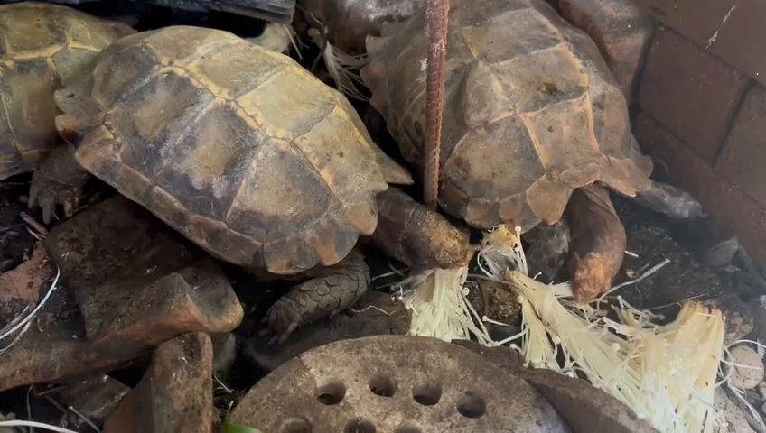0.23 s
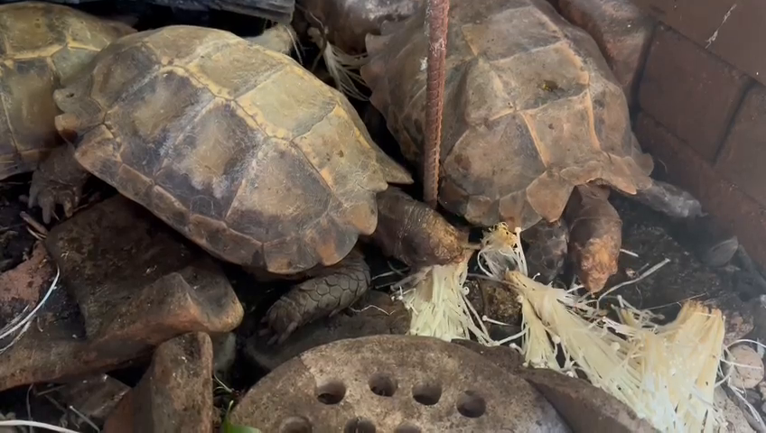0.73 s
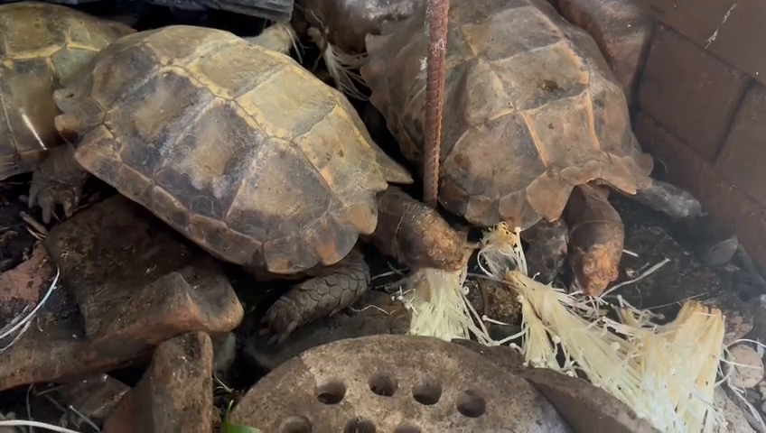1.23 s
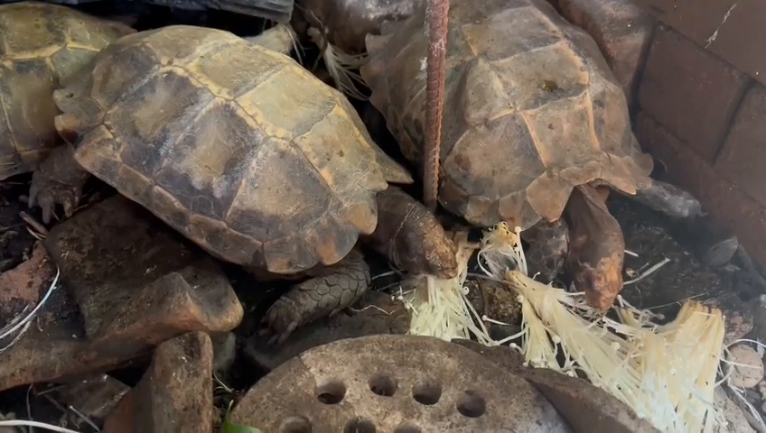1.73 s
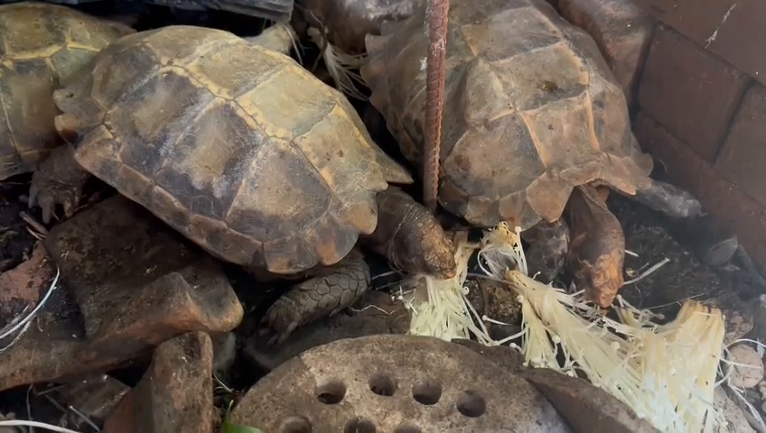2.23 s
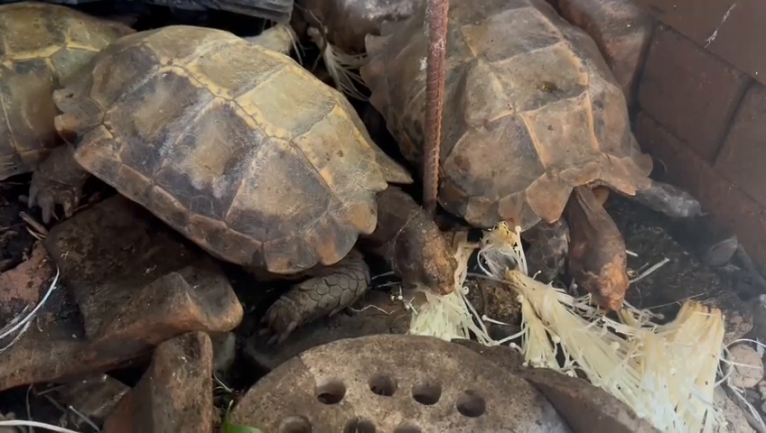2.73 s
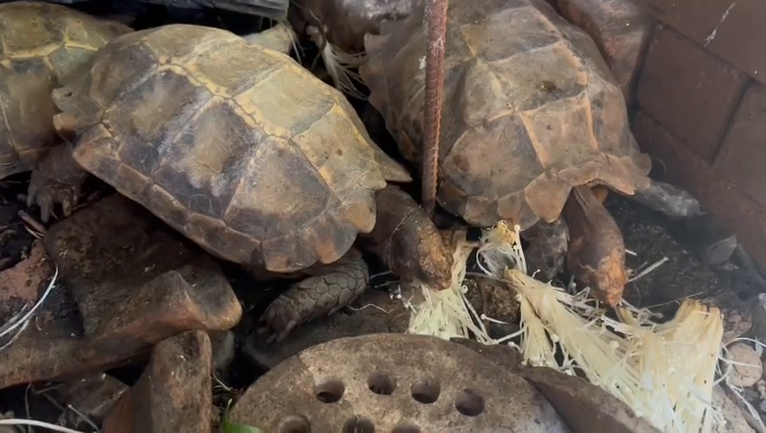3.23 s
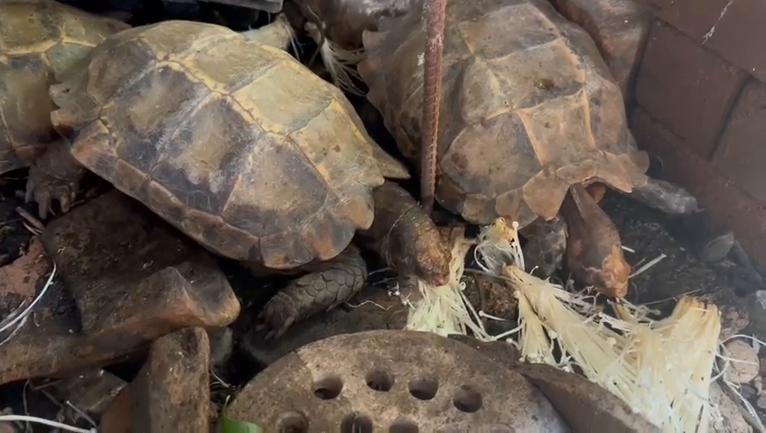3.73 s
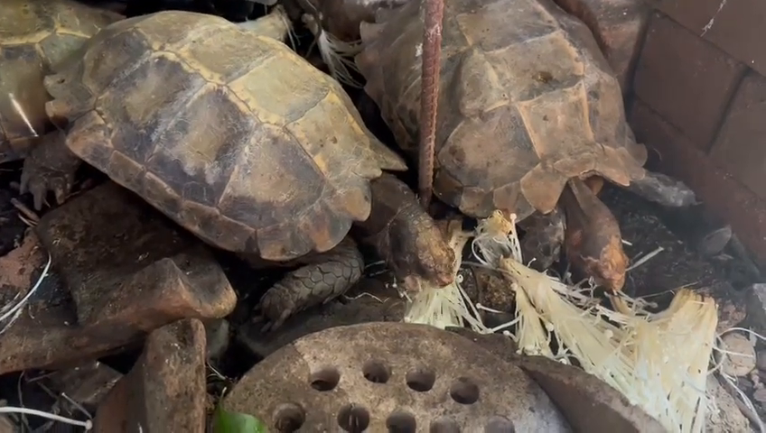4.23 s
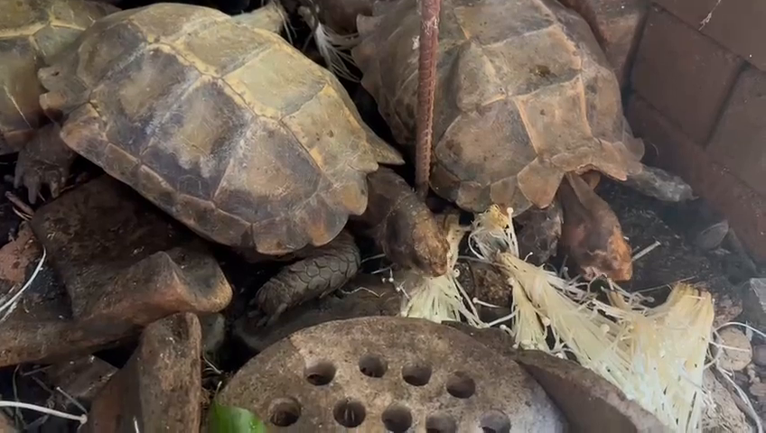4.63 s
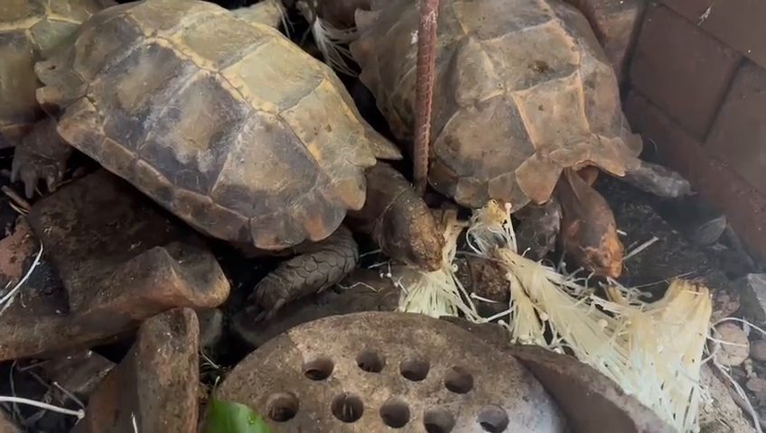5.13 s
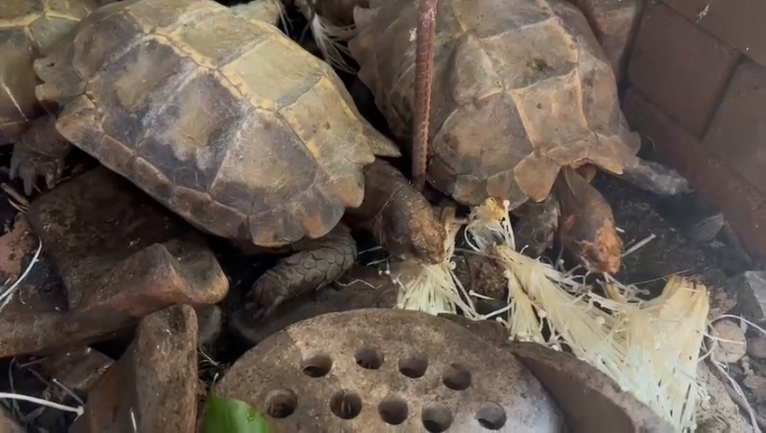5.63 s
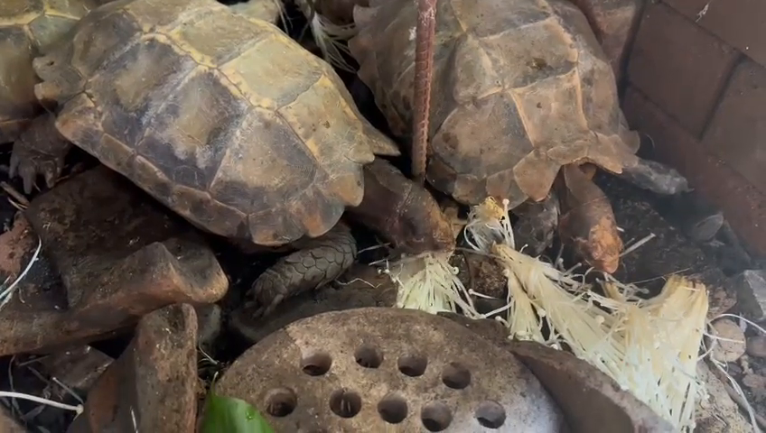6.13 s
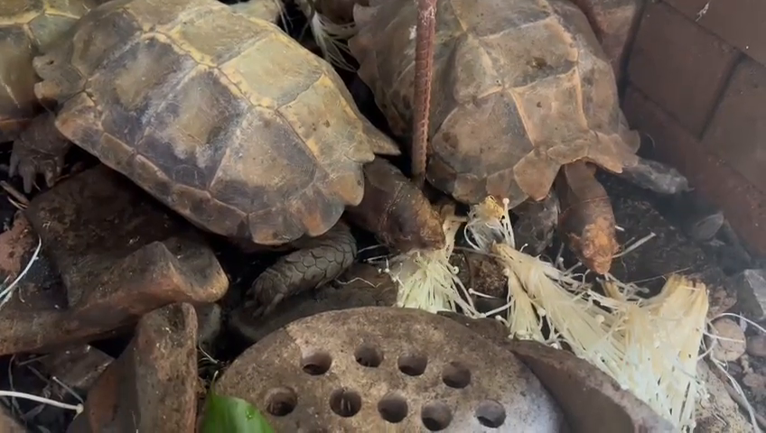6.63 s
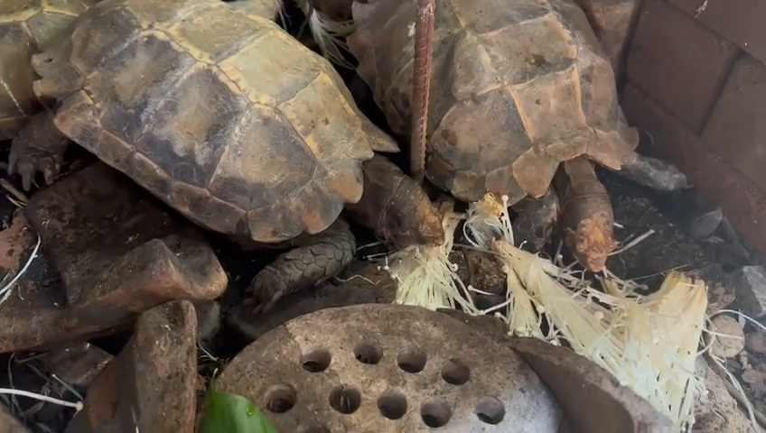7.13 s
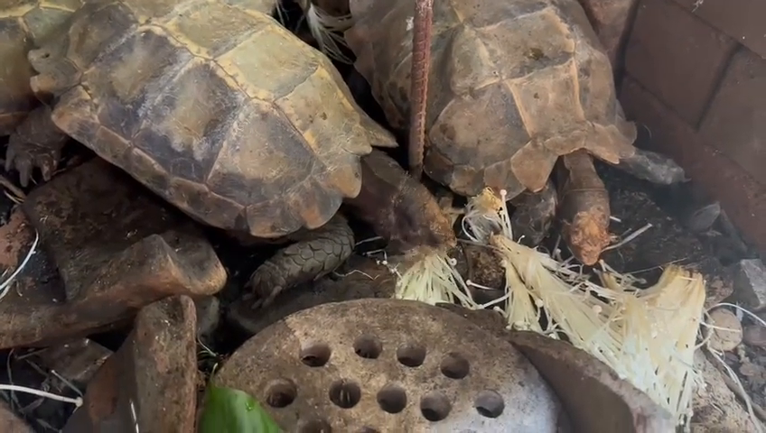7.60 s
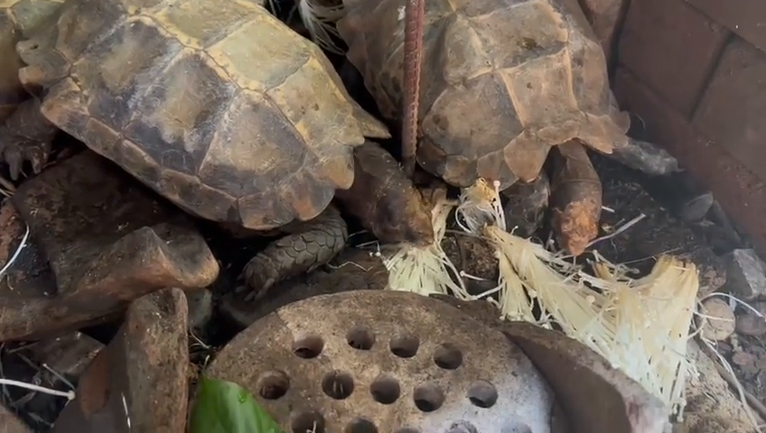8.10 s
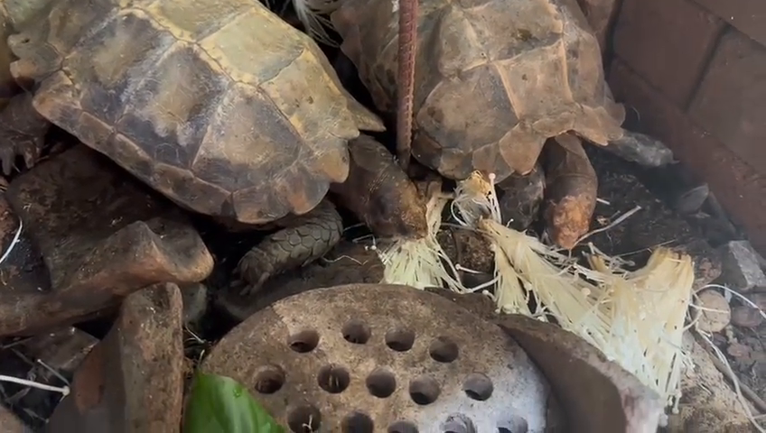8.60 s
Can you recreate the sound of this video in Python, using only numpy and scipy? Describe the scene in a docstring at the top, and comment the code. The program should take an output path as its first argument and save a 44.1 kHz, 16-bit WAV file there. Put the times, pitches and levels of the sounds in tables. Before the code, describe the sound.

A constant low rumble with faint mains hum and soft airy rush lies under close, dry feeding sounds. Tortoise beaks tug a fibrous stalk: crisp pops, short rasping peels, fine crackle, an occasional tiny squeak. Shells drag and knock dully on the floor, loudest with the biggest snaps just before four seconds. The last few seconds are quieter and scattered. Near stereo phone microphone in a small hard-walled pen.

```python
"""Stalk fibres snap, crackle and rasp under the beaks of two tortoises in a small tiled pen, heard close to.
Snaps are enveloped noise bursts in seven bands with dense pen echoes; crackle and rasp are random impulses.
Squeaks are wavering tones. Shells drag and bump as impulses and decaying sines ring shell and floor modes.
Dull impulses are claws and jaws; sines and filtered noise are a machine humming and rumbling beyond the pen."""
import sys
import numpy as np
from scipy import signal
from scipy.fft import rfft, irfft, next_fast_len
from scipy.io import wavfile
from scipy.ndimage import uniform_filter1d

SR = 44100
rng = np.random.default_rng(int(sys.argv[2]) if len(sys.argv) > 2 else 0)


def store_wav(level_fs):
    """Save 16-bit WAV to argv[1]."""
    pcm = np.round(np.clip(np.atleast_2d(level_fs), -1, 1) * 32767)
    wavfile.write(sys.argv[1], SR, pcm.T.astype(np.int16))


N = 390726
TIME_S = np.arange(N) / SR

# machine lines: pitch_hz, level_db
HUM_LINES = [(44.1, -50), (50.04, -46), (100.08, -54), (176.16, -66), (200.16, -59.5), (791.5, -69)]
# rumble spectrum: freq_hz, density_db_per_hz
RUMBLE_SPECTRUM = [(20, -15), (34, -21.5), (46, -7.5), (72, 3), (90, -6), (165, -11), (240, -17),
                   (330, -15), (420, -27), (540, -31.5)]
# slow swell of the rumble: time_s, level_db
RUMBLE_SWELL_CURVE = [(0, -0.5), (2.1, -4), (2.8, -3), (3.1, 2), (3.7, -3.5), (4.05, -1.5), (4.5, -2.5),
                      (6.4, -4), (7.5, -3), (8.85, -4.5)]
# spectrum of the rush of air: freq_hz, density_db_per_hz
AIR_SPECTRUM = [(250, -30), (520, -12), (680, 6.5), (880, 0.5), (1150, -5.5), (2300, -6.5), (4500, -12.5),
                (8300, -19), (9400, -30), (10800, -48)]
# small contacts of claws and jaws: time_s, level_db
FIDGET_CURVE = [(0, -61), (1.1, -59), (1.4, -66.5), (2.9, -63.5), (3.3, -57), (4.4, -57.5), (5.2, -62),
                (6.1, -65.5), (6.4, -59), (7.2, -58), (7.8, -62.5), (8.2, -60.5), (8.85, -59.5)]
# a beak tugs at the stalk: peak_s, build_up_s, release_s, level_db
TUG_EVENTS = [(0.09, .03, .12, -48), (0.19, .03, 0.069, -57), (0.49, .15, .18, -47.5),
              (0.65, .05, 0.061, -50), (0.78, .02, .12, -51.5), (1.13, .27, .06, -52),
              (1.38, .02, .15, -58), (1.67, .08, 0.045, -51), (1.85, .06, .27, -56.5),
              (2.4, .2, .12, -56.5), (2.64, 0.046, 0.034, -56), (2.75, .03, .025, -52.5),
              (3.22, .13, .12, -45), (3.4, .08, .11, -46), (3.68, .3, .2, -46), (3.99, .08, .25, -45),
              (4.38, .17, .2, -53.5), (4.8, .24, .14, -44), (5.02, .02, .04, -55), (5.4, .25, .5, -58.5),
              (6.32, .05, 0.055, -50.5), (6.5, .07, 0.04, -52.5), (6.72, .03, .05, -53),
              (7.28, .05, .15, -59.5), (7.49, .07, 0.1, -48), (8.07, .05, .15, -51.5),
              (8.41, .12, .2, -55.5), (8.61, 0.086, .07, -53.5), (8.73, 0.035, .1, -56)]
# fibre spectrum: freq_hz, density_db_per_hz
FIBRE_SPECTRUM = [(300, 5.5), (700, 0), (1050, 1), (1450, -2), (1900, 0), (2550, 1), (2930, -0.5),
                  (3400, -1.5), (4400, 1), (5200, -1), (7400, 4), (8600, -3), (9600, -12), (10800, -28.5)]
# a shell is shoved over the floor: peak_s, build_up_s, release_s, scrape_db, shell_ring_db
SHOVE_EVENTS = [(0.13, 0.06, 0.05, -50, -44.5), (0.59, 0.1, 0.083, -44.5, -53),
                (1.18, 0.32, 0.031, -45, -54), (3.13, 0.11, 0.14, -37, -57), (3.24, 0.2, 0.15, -39, -42),
                (3.37, 0.17, 0.26, -41, -37), (3.6, .4, 0.14, -45.5, -46), (3.78, 0.3, 0.042, -40, -32),
                (4.02, 0.03, .06, -47, -46), (4.22, 0.044, 0.11, -67, -45.5), (4.92, 0.14, 0.092, -41, -64),
                (5.59, 0.097, 0.05, -48, -62), (6.43, 0.14, 0.089, -47, -60), (6.8, 0.3, .3, -59, -60),
                (7.49, 0.076, 0.037, -43.5, -47), (8.11, 0.12, 0.22, -49, -61),
                (8.35, 0.11, 0.19, -45.5, -51), (8.73, 0.06, 0.15, -55, -58)]
# resonances of shell and floor, deepest first: freq_hz, width_hz, level_db
SHELL_MODES = [(152.1, 14, 14.5), (337, 36, 3), (394.4, 43, 7), (479, 31, -3), (695, 500, -14)]
# fibres snapping: start_s, tear_time_ms, level_db, brightness_db (dry and thin > 0, thick and juicy < 0), pitch_hz
SNAP_EVENTS = [(0.062, 0.9, -58.5, 2.5, 950), (0.1051, 1.9, -43.5, -6.5, 5260),
               (0.283, 0.29, -53, 1.5, 2510), (0.329, 0.8, -59, 5, 3200), (0.3394, 0.84, -34.5, 4, 706),
               (0.4735, 0.9, -52, -2, 3200), (0.5412, 0.26, -54.5, 4.5, 3200),
               (0.56, 1.03, -45.5, -10, 1540), (0.598, 0.74, -56, 6, 5200), (0.637, 1, -64, 12, 5200),
               (0.642, 0.79, -55, 15.5, 5200), (0.658, 0.27, -53, 12.5, 700), (0.767, 2.4, -49, -1.5, 1560),
               (0.834, 1.5, -50.5, -2, 5200), (0.855, 1.5, -53, 0, 4200), (0.947, 1.1, -64, 7, 950),
               (1.096, 0.86, -56, -10, 5200), (1.415, 0.97, -70, 9, 950), (1.6416, 0.65, -56, 7, 700),
               (1.6624, 1.15, -48, 3, 1200), (1.872, 0.94, -51.5, 3, 1200), (2.078, 1.2, -55.5, 3, 700),
               (2.5588, 0.6, -57, 0, 6500), (2.878, 0.4, -52.5, 5.5, 1550), (2.922, 0.46, -54.5, 3, 1200),
               (2.9608, 0.41, -36, 2, 5800), (3.055, 1.5, -54, 5, 1200), (3.145, 0.41, -45, -9, 5200),
               (3.1669, 1.47, -25.5, 0.5, 4080), (3.285, 0.66, -53, -9, 5170), (3.348, 1, -50, -0.5, 950),
               (3.386, 0.9, -52, -1, 4200), (3.4123, 0.51, -48.5, 0, 3200),
               (3.5205, 0.26, -52.5, 7.5, 4200), (3.553, 0.72, -50.5, 0, 3200), (3.5716, 0.39, -46, 2, 450),
               (3.609, 0.6, -56.5, 6, 6500), (3.633, 1, -39, 5, 2500), (3.637, 2.04, -29, -8, 6740),
               (3.68, 0.57, -52, -10, 3190), (3.691, 0.7, -63, -6, 7000), (3.705, 1.5, -28, 5, 454),
               (3.7405, 0.6, -29, 1, 3000), (3.77, 0.45, -36, 7.5, 2500), (3.784, 2.8, -40, 10, 1986),
               (3.891, 1.9, -56.5, 8, 5200), (3.9742, 0.6, -24.5, 2.5, 2300), (4.159, 0.34, -57, 0, 5200),
               (4.1899, 0.23, -54.5, 3, 700), (4.277, 1.5, -57, -4, 2600), (4.286, 2, -48, 4, 2700),
               (4.326, 1, -59, -7, 1400), (4.617, 0.95, -29.5, -2.5, 2420), (4.69, 0.88, -48.5, 1, 1200),
               (4.746, 0.6, -53, 5, 3200), (4.7682, 0.69, -39.5, 1.5, 950), (4.79, 0.94, -45.5, 0, 2000),
               (4.828, 0.29, -44.5, 1, 5200), (4.843, 1, -45.5, 7, 5230), (4.876, 0.8, -64, 1, 2500),
               (4.9088, 0.73, -35, -2, 940), (5.021, 0.59, -60, -1, 950), (5.122, 0.44, -56, 1, 1200),
               (5.3008, 0.68, -60.5, 4, 3200), (5.378, 0.3, -60, -0.5, 5200), (5.564, 0.74, -63.5, 3, 5230),
               (6.2604, 1.6, -49.5, -9, 604), (6.305, 1.6, -55, -10, 620), (6.425, 2, -62.5, -11, 650),
               (6.482, 1.2, -60.5, 5, 2000), (6.609, 0.71, -59.5, -9, 1580), (6.741, 1.3, -64, -10, 2500),
               (6.891, 0.79, -51.5, -1.5, 450), (7.03, 0.48, -67, -8, 3200), (7.0976, 0.25, -61, -3, 3230),
               (7.231, 0.93, -57.5, -2.5, 3540), (7.405, 0.46, -61.5, 2, 700),
               (7.4764, 1.8, -51.5, -2, 4200), (7.544, 0.8, -56, -1, 5200), (7.655, 0.91, -59.5, 2, 5170),
               (8.045, 1.06, -49, -3, 5270), (8.078, 0.35, -53.5, -6, 4200), (8.4035, 0.46, -45, 6.5, 2000),
               (8.511, 0.2, -58.5, 11.5, 700), (8.599, 0.36, -54.5, 3, 950), (8.7135, 0.6, -70, 10, 4120),
               (8.7994, 0.58, -59.5, 7.5, 4200)]
# snap bands, thud to crispness: low_hz, high_hz, onset_lag_ms, t60_s, level_db, tilt_db_per_brightness_db
SNAP_REGISTERS = [(278, 520, 1.42, 0.049, -8, -1.37), (567, 870, 0.79, 0.083, -8.5, -0.94),
                  (955, 1466, 0.32, 0.094, -7, -0.37), (1620, 2470, 0.29, 0.067, -5, -0.28),
                  (2470, 3970, 0.2, .065, -3, -0.15), (4180, 6900, 0.14, 0.069, -3, .5),
                  (5780, 9150, 0.021, 0.046, -4, 1.054)]
# body lurches and shell bumps as a stalk gives: start_s, shell_ring_db, floor_knock_db
JOLT_EVENTS = [(0.1039, -45, -36.5), (0.337, -39, -64), (0.5627, -34, -41), (2.9611, -45, -66),
               (3.167, -24, -29.5), (3.378, -41, -31.5), (3.639, -24, -24), (3.711, -22.5, -22),
               (3.74, -20.5, -25), (3.771, -26.5, -41), (3.9749, -30, -38.5), (4.614, -25.5, -39),
               (7.231, -37, -54), (7.48, -27.5, -41), (8.043, -41, -48)]
# floor knock: freq_hz, t60_s, level_db
KNOCK_MODES = [(320, .06, -10.5), (390.2, 0.12, 2), (465.6, 0.086, 0.5), (525, 0.061, -7)]
# strips peeling: start_s, length_s, level_db, swell_db (start to end), brightness_db
PEEL_EVENTS = [(0.38, 0.2, -49.5, 1, 6), (0.603, .12, -53.5, 1, 2), (0.761, 0.11, -50, 7, -1),
               (.92, 0.28, -52.5, 6, -8), (2.285, 0.19, -63.5, 9, 3), (3.193, 0.41, -54.5, -7, -4.5),
               (3.652, 0.154, -47.5, 14, -3.5), (3.98, 0.15, -48, -17, -4), (4.247, 0.22, -61.5, 11, 4),
               (4.652, 0.25, -47, 15, -1), (6.278, 0.26, -60.5, 2, -13), (7.44, .12, -50, -5, -6),
               (8.065, 0.13, -58, -13, -15)]
# taut fibres squeaking on a beak: start_s, length_s, pitch_hz, level_db (before gain_db)
SQUEAK_EVENTS = [(0.762, 0.022, 2550, -44.5), (1.576, 0.069, 3240, -60), (3.008, 0.1, 1504, -51.5),
                 (4.006, 0.11, 3090, -47), (5.298, 0.01, 3550, -49.5), (6.008, 0.65, 2910, -71),
                 (6.822, 0.023, 1360, -55)]
# resonances of the pen and the things in it: freq_hz, width_hz, level_db
PEN_MODES = [(378, 11, -10.5), (930, 99, -9.5), (1755, 59, -11.5), (2560, 31, -18), (2920, 185, -8.5),
             (5990, 80, -10)]
# side against mid, scattered sound: freq_hz, level_db
SCATTER_CURVE = [(60, -31), (170, -21), (350, -15), (520, -5), (700, -3.5), (1200, -3.5), (2000, -7.5),
                 (3000, -1.5), (4200, -1), (6300, -4.5), (9000, 2), (11000, 13)]
# side against mid, sound reaching the right port first: freq_hz, level_db
LEAD_CURVE = [(100, -62), (450, -7), (800, 0.5), (2000, -18.5), (4500, -14), (6500, -29.5), (8500, 4),
              (11000, 18)]
# side against mid, in step, animals nearer the right port: freq_hz, level_db
RIGHTWARD_CURVE = [(200, -65), (400, -30), (600, -22.5), (850, -24.5), (1150, -12), (1800, -33),
                   (4000, -40.5)]

TUG_SWELL_DB, SHOVE_SWELL_DB = 12, 22.5  # rise over the build-up, fall over the release
CHEW_DB, SHUFFLE_DB = -67, -61.5  # quiet chewing and shifting feet between efforts
RESTLESS_DB, RESTLESS_PER_S = 3, 7  # waver of that quiet activity
JERK_DB, JERKS_PER_S = 1.0, 30  # catch and slip of an effort
RING_DB, RING_OCTAVES = 7, 0.4  # lift around each fibre's own pitch
EARLY_DB, EARLY_S = 3.5, 0.03  # unevenness of the first reflections and its decay
PEEL_EDGE_S, PEEL_SPLIT_HZ = 0.017, 3800  # fade in and out; brightness pivot
TOP_HZ = 11800


def undb(db):
    """Decibels to gain."""
    return 10 ** (np.asarray(db) / 20)


def unit(x):
    """Scale to rms 1."""
    return x / np.sqrt(np.mean(x ** 2) + 1e-20)


def colour(x, points, turn=1):
    """Filter by a (freq_hz, level_db) curve; a complex turn also shifts the phase."""
    curve_hz, curve_db = np.transpose(points)
    size = next_fast_len(N + 4096)
    bin_hz = np.maximum(np.arange(size // 2 + 1) * SR / size, 1)
    gain = undb(np.interp(np.log(bin_hz), np.log(curve_hz), curve_db))
    return irfft(rfft(x, size) * turn * gain, size)[..., :N]


def band(x, low_hz, high_hz, order=2):
    """Causal band-pass."""
    edges_hz = [low_hz, min(high_hz, SR / 2 - 1)]
    return signal.sosfilt(signal.butter(order, edges_hz, "band", fs=SR, output="sos"), x)


def walk(changes_per_s):
    """Smooth random curve of rms 1."""
    step = max(int(SR / changes_per_s), 2)
    held = np.repeat(rng.standard_normal(N // step + 1), step)
    return unit(uniform_filter1d(held, step)[:N])


def grains(rate_per_s, spread_db):
    """Random impulses: many small, a few large."""
    chance = rng.random(N) * SR / rate_per_s
    hit = chance < 1
    sizes = undb(spread_db * np.minimum(-np.log(chance[hit]), np.pi))
    out = np.zeros(N)
    out[hit] = sizes * (-1) ** np.flatnonzero(hit)  # sign by odd or even sample
    return unit(out / np.sqrt(rate_per_s))


def echoes(t60_s, direct):
    """Mid and side response: direct sound, then dense reflections dying away."""
    t = TIME_S[:int(t60_s * SR)]
    response = rng.standard_normal((2, len(t))) * np.exp(-np.log(1000) * t / t60_s)
    response *= undb(EARLY_DB * np.exp(-t / EARLY_S) * rng.standard_normal(response.shape))
    response /= np.sqrt(np.sum(response ** 2) / 2)
    response[0, 0] += direct
    return response / np.sqrt(1 + direct ** 2)


def in_pen(x, t60_s, direct):
    """A sound with its reflections, as mid and side."""
    return signal.oaconvolve(x[None], echoes(t60_s, direct), axes=1)[:, :len(x)]


def effort(rows, swell_db, rest_db):
    """Level in dB over time: efforts build jerkily and let go above a restless quiet activity."""
    t = TIME_S[::64]
    power = undb(rest_db + RESTLESS_DB * walk(RESTLESS_PER_S)[::64]) ** 2
    for peak_s, build_s, release_s, level_db in rows:
        building = (peak_s - t) / max(build_s, .005)
        releasing = (t - peak_s) / max(release_s, .005)
        away = np.minimum(np.maximum(building, releasing), 10)
        power = power + undb(level_db - swell_db * away) ** 2
    return np.interp(TIME_S, t, 10 * np.log10(power)) + JERK_DB * walk(JERKS_PER_S)


def machine(rumble_db=-44.0, air_db=-60, waver_db=2.5):
    """Mains hum and a motor's lines, wavering sines, over uneven rumble and a soft rush of air."""
    hum = 0
    for pitch_hz, level_db in HUM_LINES:
        phase = 2 * np.pi * (pitch_hz * TIME_S + rng.random()) + 0.22 * walk(0.72)
        hum = hum + undb(level_db + waver_db * walk(2.4)) * np.sin(phase)
    surge_db = 1.2 * walk(7) + np.interp(TIME_S, *np.transpose(RUMBLE_SWELL_CURVE))
    rumble = band(colour(rng.standard_normal((2, N)), RUMBLE_SPECTRUM), 36.4, 530, order=3)
    rumble = unit(rumble) * undb(rumble_db + surge_db)
    air = unit(colour(rng.standard_normal((2, N)), AIR_SPECTRUM)) * undb(air_db + 0.78 * walk(3.6))
    return rumble + air + hum * np.array([[1], [0]])  # hum in mid only


def fidget(rate_per_s=40, spread_db=3.5, side_db=-4):
    """Claws and jaws nudge scraps on the floor: soft, dull contacts in three places."""
    contacts = sum(in_pen(grains(rate_per_s, spread_db), t60_s=.07, direct=0.33) for _ in range(3))
    level_db = np.interp(TIME_S, *np.transpose(FIDGET_CURVE))
    return unit(band(contacts, 372, 1060)) * undb(level_db) * undb([[0], [side_db]])


def pings(impulses, low_hz, high_hz, decay_cycles):
    """Every impulse rings for a few cycles at a pitch of its own."""
    at = np.flatnonzero(impulses)[:, None]
    n = np.arange(SR // 100)
    pitch_hz = low_hz * (high_hz / low_hz) ** rng.random(at.shape)
    turns = pitch_hz * n / SR
    rings = impulses[at] * pitch_hz * np.exp(-turns / decay_cycles) * np.sin(2 * np.pi * turns)
    return unit(np.bincount((at + n).ravel(), rings.ravel(), N)[:N])


def crackle(rate_per_s=65, spread_db=4.0, side_db=-1, ping_db=-4, decay_cycles=1.8):
    """Strands part one by one, more often the harder they are pulled; each ticks and rings briefly."""
    pull_db = effort(TUG_EVENTS, TUG_SWELL_DB, CHEW_DB)
    busy_per_s = rate_per_s * undb(0.89 * (pull_db - np.mean(pull_db)))
    sound = 0
    for _ in range(4):  # four places, each with its own reflections
        strands = grains(busy_per_s, spread_db)
        ticks = strands + undb(ping_db) * pings(strands, 800, 7300, decay_cycles)
        sound = sound + in_pen(ticks, t60_s=0.07, direct=0.65)
    return unit(colour(sound, FIBRE_SPECTRUM)) * undb(pull_db) * undb([[0], [side_db]])


def sustain(x, grip):
    """Friction keeps feeding a resonance, which evens out its swells; grip 0-1."""
    power = uniform_filter1d(unit(x) ** 2, SR // 50, axis=-1)
    return unit(x / np.maximum(power, 1e-6) ** (grip / 2))


def drag(side_db=-4, rate_per_s=2500, spread_db=1, ring_rest_db=-62):
    """Stick-slip knocks ring shell and floor; the deepest mode sounds as the shell bears the weight."""
    rows = np.array(SHOVE_EVENTS)
    scrape_rows, ring_rows = rows[:, :-1], np.delete(rows, -2, axis=1)
    slips = np.array([grains(rate_per_s, spread_db), grains(rate_per_s, spread_db)])
    deep, *upper = [undb(db) * band(slips, hz - width_hz / 2, hz + width_hz / 2, order=1)
                    for hz, width_hz, db in SHELL_MODES]
    upper = sustain(band(sum(upper), 283, 1310), grip=.45)
    upper = upper * undb(effort(scrape_rows, SHOVE_SWELL_DB, SHUFFLE_DB))
    deep = sustain(band(deep, 128, 205), grip=0.87)
    deep = deep * undb(effort(ring_rows, SHOVE_SWELL_DB, ring_rest_db))
    return (upper + deep) * undb([[0], [side_db]])


def register_levels():
    """Snap level per register: brightness tips thud against crispness; the fibre's own pitch stands out."""
    _, _, level_db, bright_db, pitch_hz = np.transpose(SNAP_EVENTS)
    levels = []
    for low_hz, high_hz, _, _, register_db, tilt in SNAP_REGISTERS:
        octaves = np.log2(np.sqrt(low_hz * high_hz) / pitch_hz)
        lift_db = RING_DB * np.exp(-.5 * (octaves / RING_OCTAVES) ** 2)
        levels.append(level_db + register_db + tilt * bright_db + lift_db)
    return levels


def even(x, width_hz):
    """Fill broad spectral holes with a minimum-phase filter, keeping onset and narrow resonances."""
    spectrum = rfft(x)
    size = x.shape[-1]
    power = uniform_filter1d(np.abs(spectrum) ** 2, max(int(width_hz * size / SR), 1))
    cepstrum = irfft(-np.log(np.maximum(power, 1e-12)), size)
    cepstrum[..., size // 2:] = cepstrum[..., :1] = 0  # causal half only
    return irfft(spectrum * np.exp(rfft(cepstrum)), size)


def snaps(side_db=-3, direct=0.27, tail_db=-22, tail_t60_s=0.18, uneven_db=5):
    """Fibres give way in a run of tiny fractures; low registers start later, each ringing for its t60."""
    t = TIME_S[:SR // 10]
    head = SR // 50  # levels hold for the first 20 ms
    starts_s, tear_ms, *_ = np.transpose(SNAP_EVENTS)
    age = 1000 * t / tear_ms[:, None]
    fractures = rng.standard_normal(age.shape) * undb(uneven_db * rng.standard_normal(age.shape))
    fractures *= age * np.exp(-age)
    out = np.zeros((2, N + SR))
    for (low_hz, high_hz, lag_ms, t60_s, *_), levels_db in zip(SNAP_REGISTERS, register_levels()):
        bursts = even(np.array([in_pen(run, t60_s, direct) for run in fractures]), width_hz=1100)
        rings = band(bursts, low_hz, high_hz, order=3)
        rings /= np.sqrt(np.mean(rings[..., :head] ** 2, axis=2, keepdims=True))
        for start_s, ring, level_db in zip(starts_s, rings, levels_db):
            i = int((start_s + lag_ms / 1000) * SR)
            out[:, i:i + len(t)] += ring * undb(level_db)
    out = out[:, :N] * undb([[0], [side_db]])
    # the yard beyond the pen answers faintly
    return out + undb(tail_db) * in_pen(out[0], tail_t60_s, 0)


def recoil(gain_db=-1, shell_t60_s=0.15, rise_ms=5, detune=0.018, right_db=-16):
    """Each jolt of the body rings the shell's deepest resonance and knocks it on the floor."""
    t = TIME_S[:SR // 4]
    rise = 1 - np.exp(-1000 * t / rise_ms)

    def ring(hz, t60_s):
        """Decaying sine with a soft onset."""
        return rise * np.exp(-np.log(1000) * t / t60_s) * np.sin(2 * np.pi * hz * t)

    out = np.zeros((2, N + SR))
    for start_s, shell_db, knock_db in JOLT_EVENTS:
        shell_hz = SHELL_MODES[0][0] * (1 + detune * rng.standard_normal())
        knock = sum(undb(db) * ring(hz, t60_s) * rng.choice([-1, 1]) for hz, t60_s, db in KNOCK_MODES)
        i = int(start_s * SR)
        out[0, i:i + len(t)] += undb(shell_db + gain_db) * ring(shell_hz, shell_t60_s)
        # negative side: the knock leans right
        out[:, i:i + len(t)] += undb(knock_db) * knock * np.array([[1], [-undb(right_db)]])
    return out[:, :N]


def peel(rate_per_s=380, spread_db=5, side_db=-1, catch_db=1.55, catches_per_s=55):
    """Cell walls part in a close run of tiny cracks as a strip peels; the run wavers and ends abruptly."""
    cracks = sum(in_pen(grains(rate_per_s, spread_db), t60_s=0.049, direct=0.57) for _ in range(2))
    cracks = unit(colour(cracks, FIBRE_SPECTRUM))
    dull = signal.sosfiltfilt(signal.butter(2, PEEL_SPLIT_HZ, fs=SR, output="sos"), cracks)
    crisp = cracks - dull
    out = np.zeros((2, N))
    for start_s, length_s, level_db, swell_db, bright_db in PEEL_EVENTS:
        now = (TIME_S > start_s) & (TIME_S < start_s + length_s)
        t = TIME_S[now] - start_s
        edges = np.minimum(np.minimum(t, length_s - t) / PEEL_EDGE_S, 1)
        envelope = edges * undb(level_db + swell_db * (t / length_s - .5))
        rasp = dull[:, now] * undb(-bright_db / 2) + crisp[:, now] * undb(bright_db / 2)
        out[:, now] += envelope * rasp
    return out * undb(catch_db * walk(catches_per_s)) * undb([[0], [side_db]])


def squeaks(gain_db=-1, waver=0.017, wavers_per_s=240, rough_db=4, side_db=-4):
    """A strand slips through a beak with a brief, thin tone that wavers in pitch and strength."""
    out = np.zeros((2, N))
    bend = 1 + waver * walk(wavers_per_s)
    grip = undb(rough_db * walk(wavers_per_s))
    for start_s, length_s, pitch_hz, level_db in SQUEAK_EVENTS:
        i, n = int(start_s * SR), int(length_s * SR)
        phase = 2 * np.pi * np.cumsum(pitch_hz * bend[i:i + n]) / SR
        tone = np.array([np.sin(phase), np.cos(phase)]) * grip[i:i + n]
        out[:, i:i + n] += unit(tone * signal.windows.tukey(n)) * undb(level_db + gain_db)
    return out * undb([[0], [side_db]])


def mottle(x, depth_db=3.5, changes_per_s=38, gain_db=-1):
    """Strands of many thicknesses take turns: ten overlapping bands waver independently."""
    size = next_fast_len(N)
    spectrum = rfft(x, size)
    centres_hz = np.geomspace(700, 9000, 10)
    place = np.interp(np.arange(size // 2 + 1) * SR / size, centres_hz, np.arange(len(centres_hz)))
    out = 0
    for k in range(len(centres_hz)):
        part = irfft(spectrum * np.maximum(1 - abs(place - k), 0), size)[:, :N]
        out = out + part * undb(gain_db + depth_db * walk(changes_per_s))
    return out


def resonate(x):
    """Hollows and close walls lift a few narrow pitches."""
    return x + sum(undb(db) * band(x, hz - width_hz / 2, hz + width_hz / 2, order=1)
                   for hz, width_hz, db in PEN_MODES)


def ports(sound):
    """Two close ports hear the bass alike, the middle louder on the right, the treble out of step."""
    mid, scattered = sound
    lagging = colour(mid, LEAD_CURVE, turn=-1j)  # quarter cycle: left lags right
    side = colour(scattered, SCATTER_CURVE) + lagging - colour(mid, RIGHTWARD_CURVE)
    return np.array([mid + side, mid - side])


def scene():
    """Feeding, body and shell sounds over the machine, from mid and scattered sound to left and right."""
    fibres = resonate(snaps() + mottle(crackle() + peel()))
    return ports(fibres + recoil() + squeaks() + drag() + fidget() + machine())


def record(dry):
    """The handheld phone rounds the sharpest peaks and cuts the top."""
    ceiling = .85
    rounded = ceiling * np.tanh(dry / ceiling)
    return signal.sosfilt(signal.ellip(8, .2, 70, TOP_HZ, fs=SR, output="sos"), rounded)


dry = scene()
out = record(dry)
store_wav(out)
```